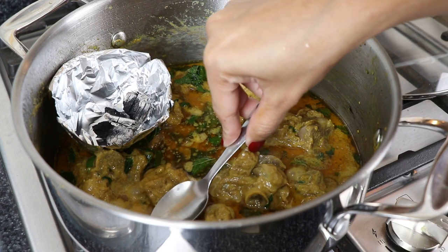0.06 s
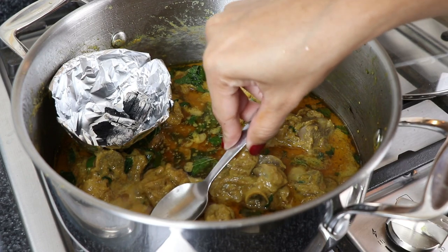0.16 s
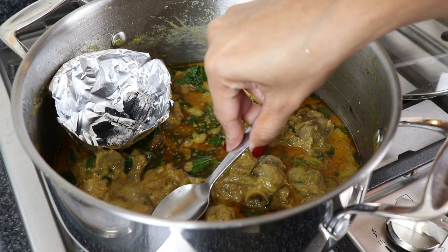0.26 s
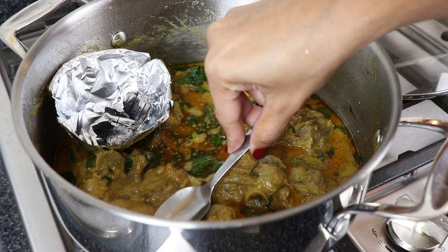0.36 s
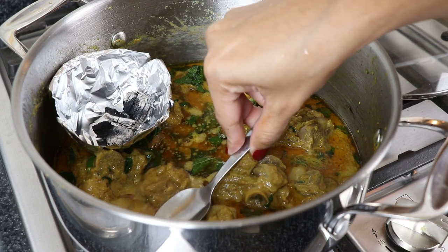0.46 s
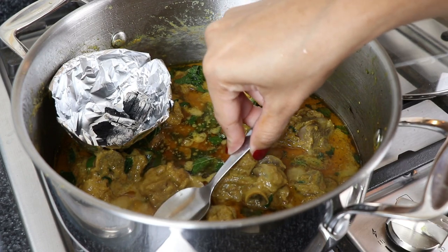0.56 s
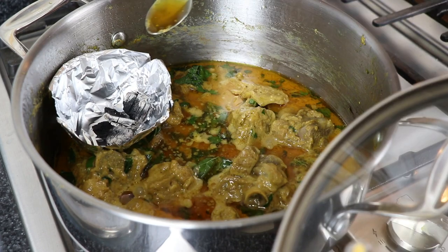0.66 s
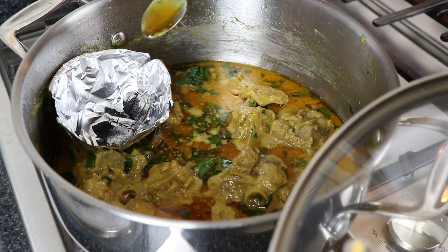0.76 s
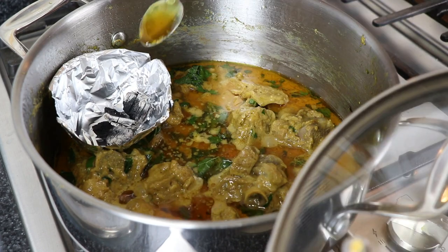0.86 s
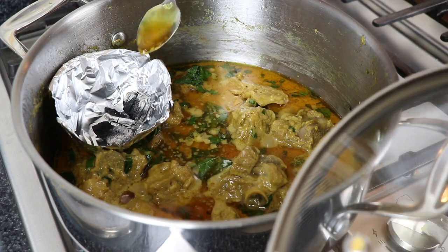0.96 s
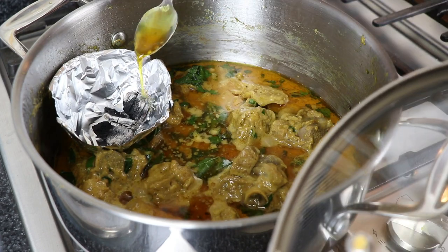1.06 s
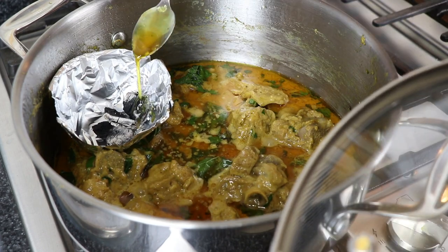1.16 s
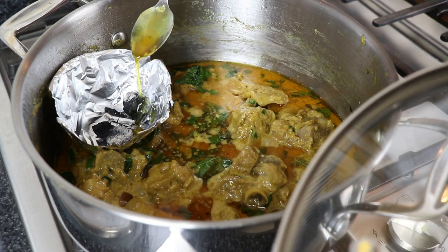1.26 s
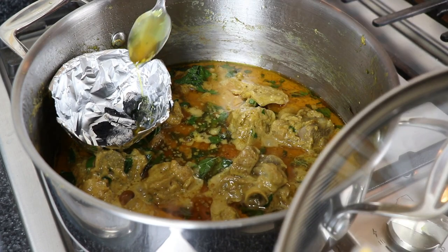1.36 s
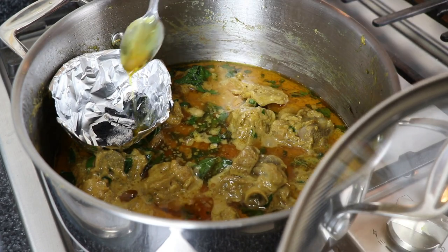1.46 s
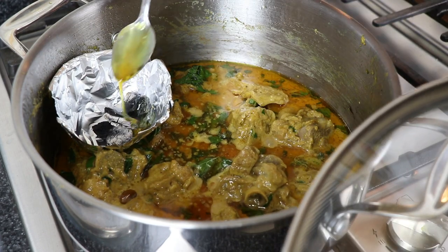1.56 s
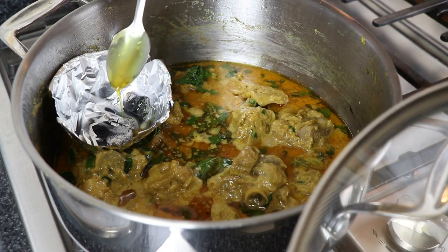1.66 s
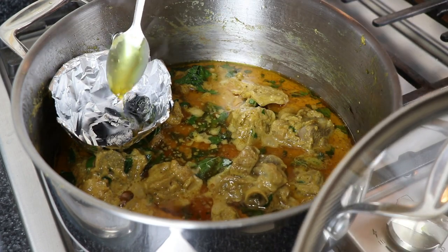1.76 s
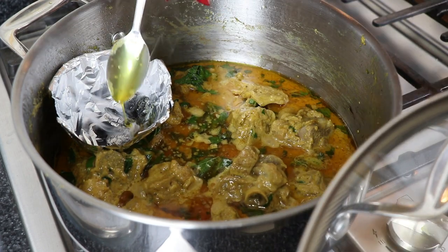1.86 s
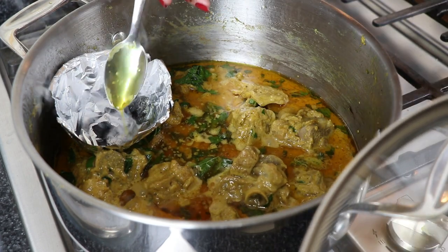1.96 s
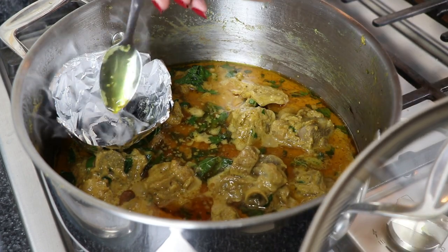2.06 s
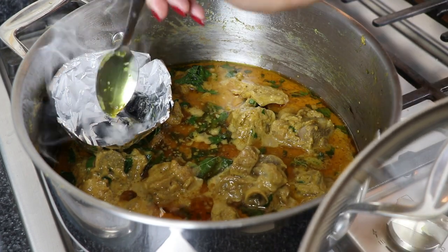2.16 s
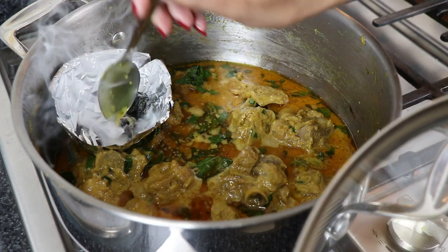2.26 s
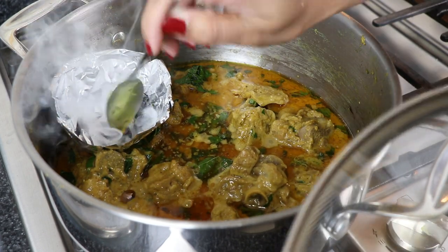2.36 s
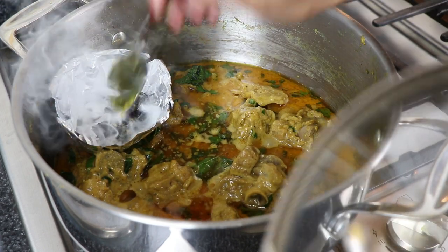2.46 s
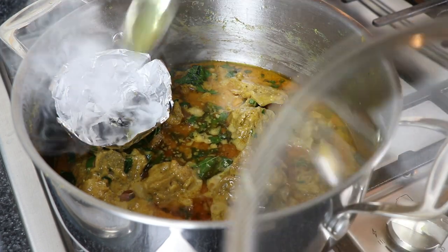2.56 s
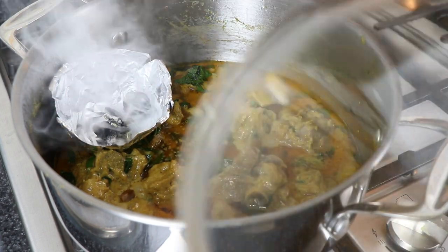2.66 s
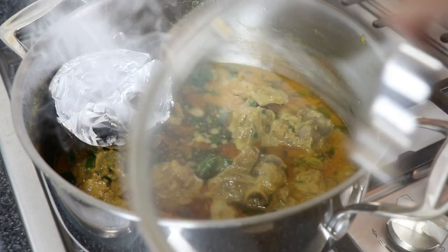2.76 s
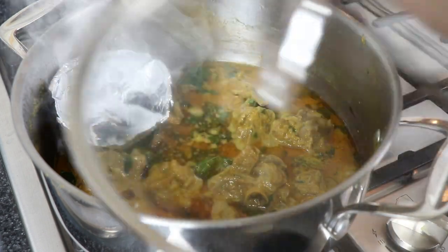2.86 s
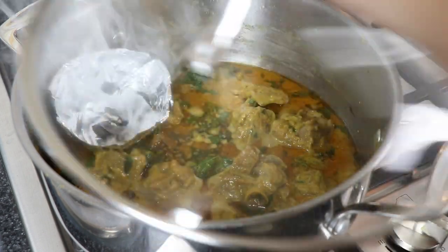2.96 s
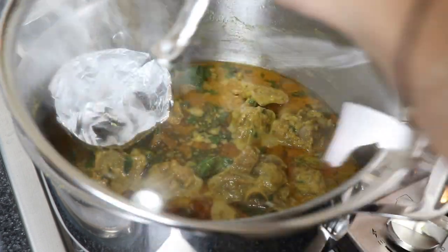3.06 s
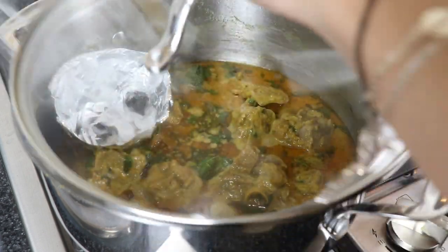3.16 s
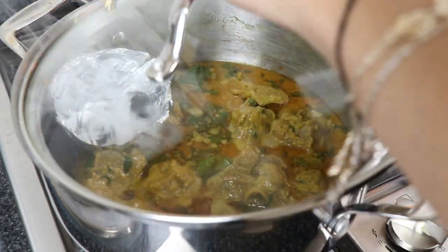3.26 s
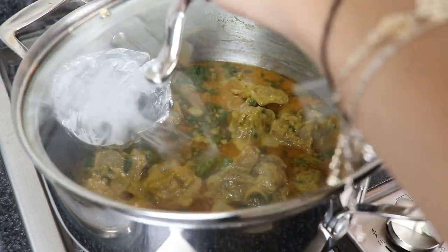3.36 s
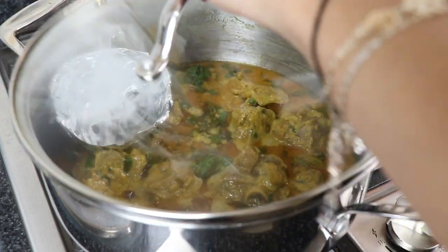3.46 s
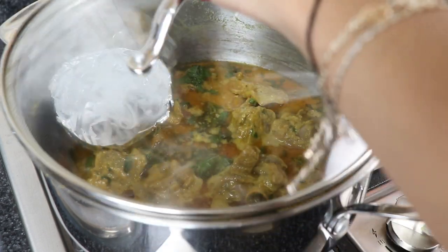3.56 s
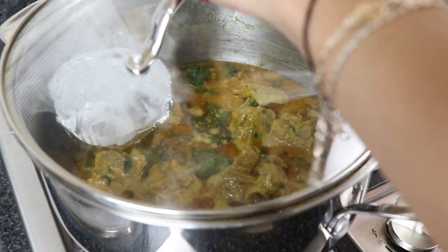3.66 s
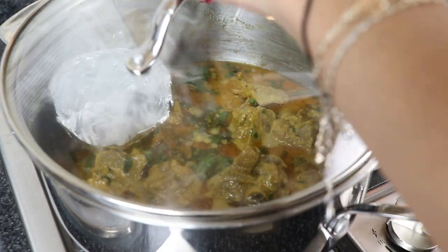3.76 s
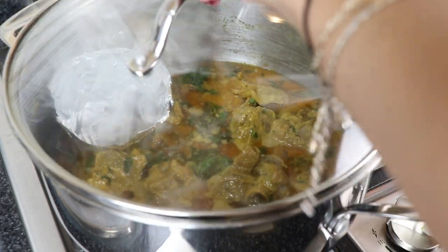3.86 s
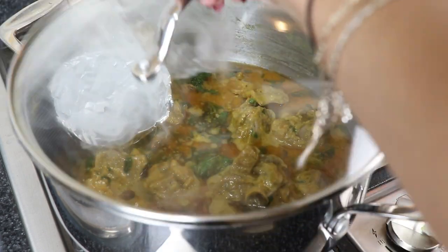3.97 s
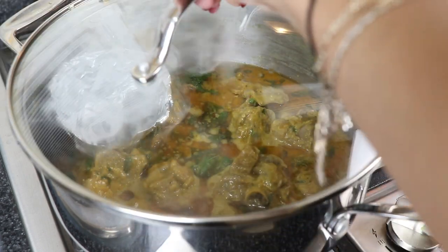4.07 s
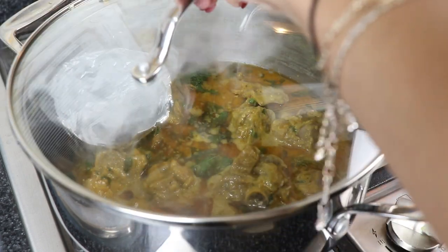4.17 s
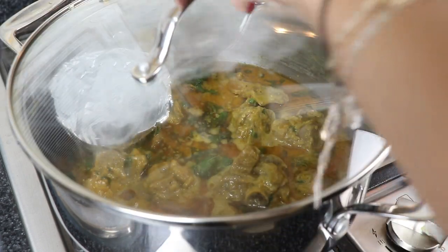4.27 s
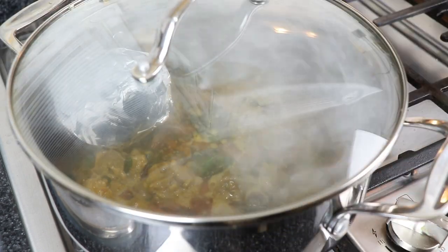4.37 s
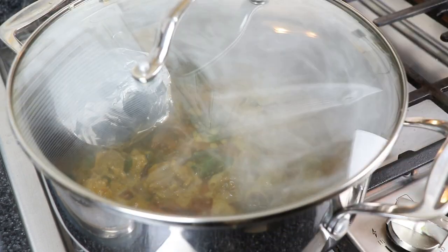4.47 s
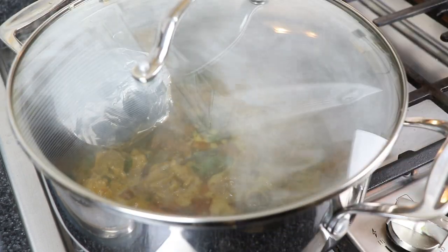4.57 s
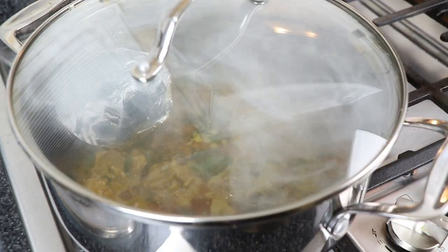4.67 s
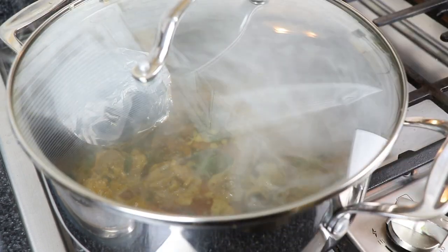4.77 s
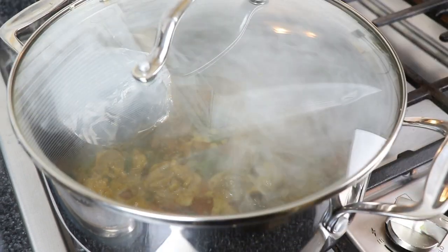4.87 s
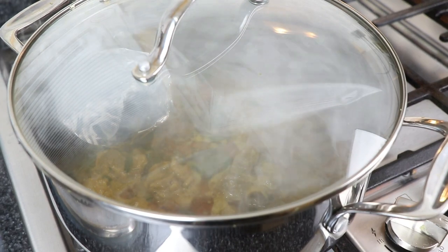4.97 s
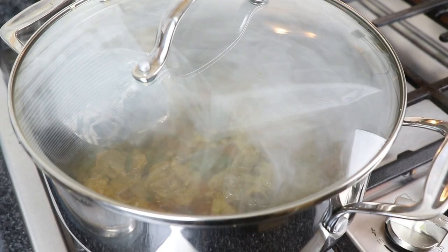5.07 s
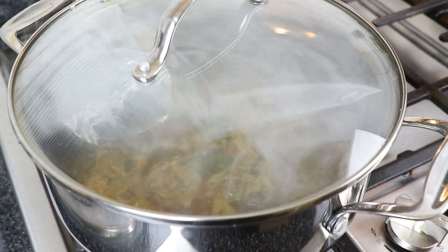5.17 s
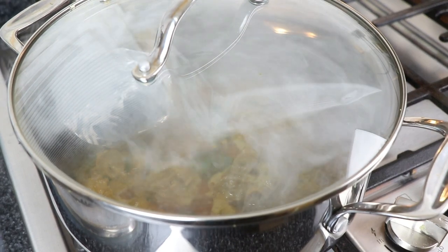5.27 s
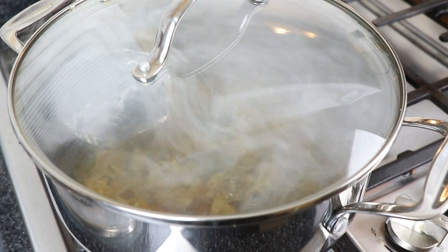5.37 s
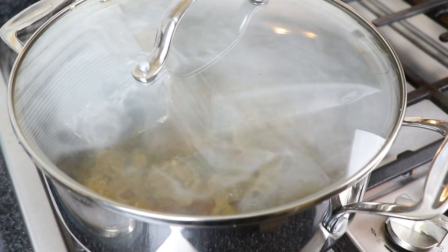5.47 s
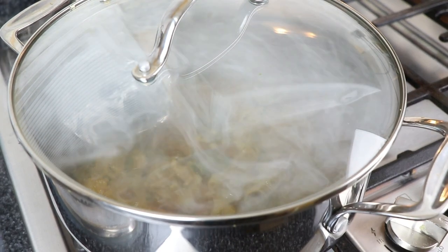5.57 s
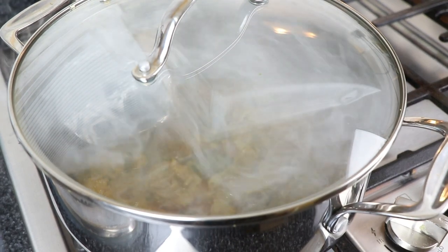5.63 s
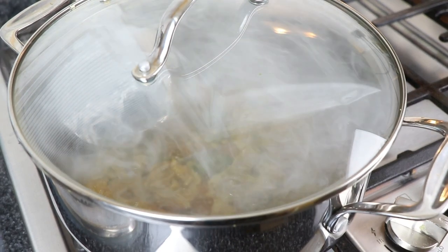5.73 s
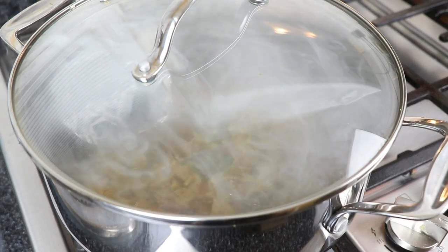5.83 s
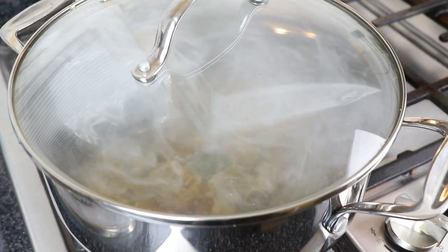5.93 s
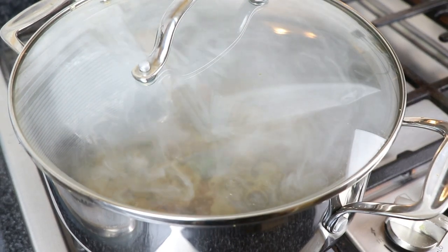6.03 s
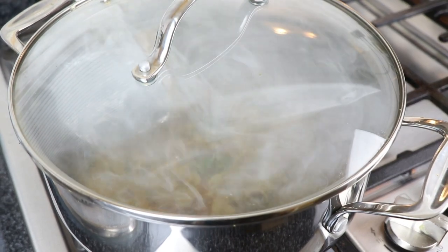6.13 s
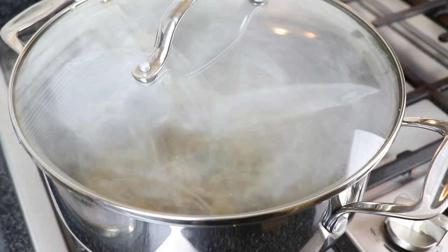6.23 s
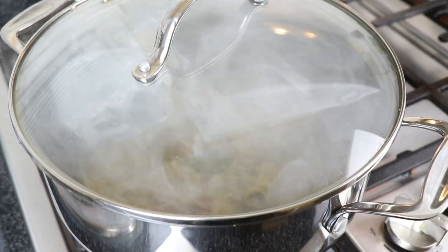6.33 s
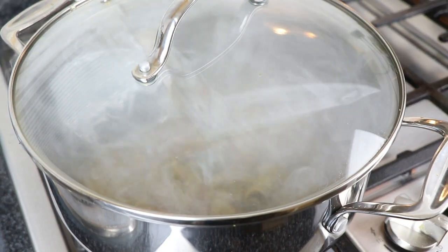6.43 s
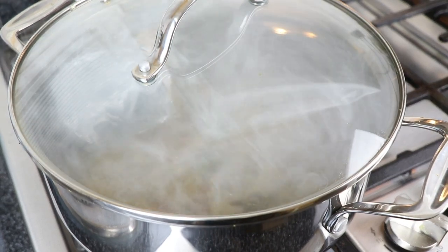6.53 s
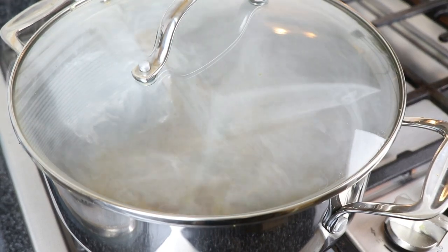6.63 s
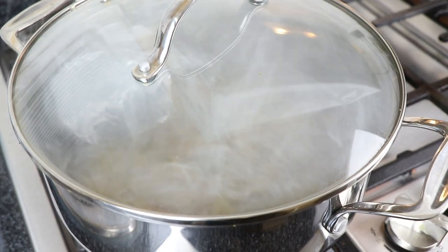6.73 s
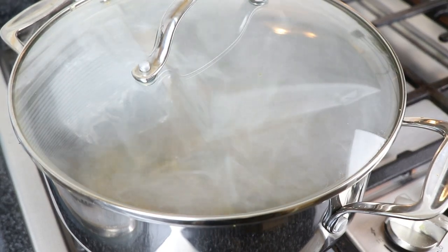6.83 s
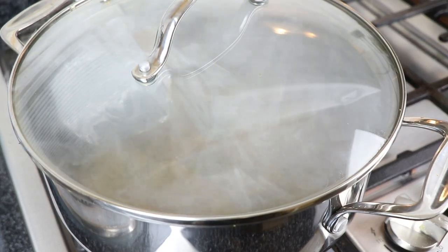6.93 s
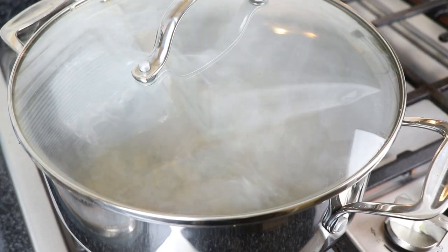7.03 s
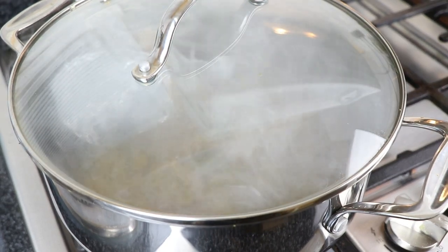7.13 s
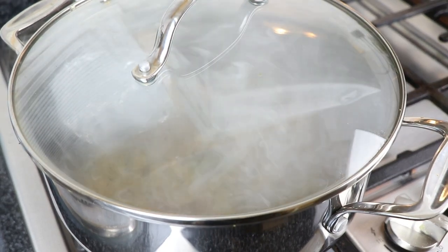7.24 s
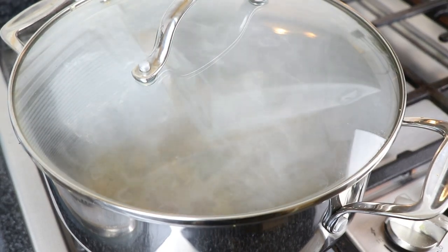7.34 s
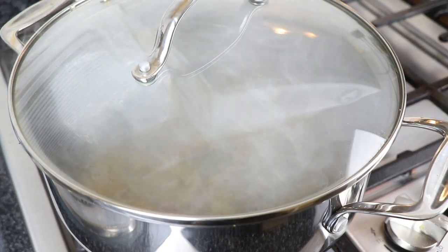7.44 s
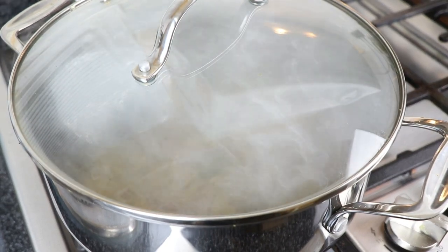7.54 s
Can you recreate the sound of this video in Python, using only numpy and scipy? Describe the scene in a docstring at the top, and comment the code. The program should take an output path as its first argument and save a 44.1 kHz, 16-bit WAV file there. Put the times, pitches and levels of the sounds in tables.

```python
"""A quiet kitchen: melted fat is spooned onto glowing charcoal in a foil cup inside a steel pot of curry.
The fat sizzles as a dense crowd of random pops over vapour hiss, and spits as short band-limited bursts.
A glass lid knocks on the rim, is nudged about and slides into its seat: each contact excites modes of lid and pot.
Under the lid the sizzle dies to single spits. Steady noise and one low buffet of air lie behind.
A close stereo microphone with a limiter hears it all."""
import sys
import numpy as np
from scipy import signal
from scipy.fft import rfft, irfft, next_fast_len
from scipy.io import wavfile

SR = 44100
rng = np.random.default_rng(int(sys.argv[2]) if len(sys.argv) > 2 else 0)


def bounce(signal):
    """Save signal as a 16-bit WAV file at the path given by the first command-line argument."""
    frames = np.transpose(np.atleast_2d(signal))
    limited = np.clip(frames, -1, 1)
    pcm = np.round(limited * 32767).astype(np.int16)
    wavfile.write(sys.argv[1], SR, pcm)


N = 335154
TIME = np.arange(N) / SR

# Spectrum of the kitchen background. Each row: frequency in Hz, relative density in dB per Hz.
KITCHEN_SPECTRUM = [(20, -9), (60, 0), (130, -1), (240, 0.5), (400, -0.5), (850, -2.5), (1500, -4),
                    (2500, -6.5), (5000, -10), (10000, -19.5), (16000, -27.5)]
# Coherence of sound arriving from all round. Each row: frequency in Hz, left-right likeness from -1 to 1.
DIFFUSE_LIKENESS = [(60, 0.79), (130, 0.31), (290, 0.46), (640, 0.44), (1410, 0.14), (3100, 0.041),
                    (6820, 0.13), (15000, 0.38)]
# Coherence of the close lid, alike on both sides in the bass. Each row: frequency in Hz, likeness from -1 to 1.
LID_LIKENESS = [(100, 0.96), (330, 0.98), (640, 0.8), (1400, 0.25), (3000, 0.083), (7000, 0.4),
                (15000, -0.45)]
# Clear modes of lid and pot. Each row: frequency in Hz, relative level in dB, free ring time t60 in seconds.
CLEAR_MODES = [(264, -5, .55), (320, -9, .45), (397, -7, .42), (463, -6, .35), (555, -6, .35),
               (662, -9, .45), (1061, -1.5, .42), (1234, -5, .35), (1437, -5, .4), (1529, -8, .5),
               (1642, -1, .42), (1737, -8, .42), (1822, -7, .42), (2341, -5, .5), (2444, -13, .5),
               (2660, -6, .5), (2948, -8, .5), (3101, -7, .45), (3252, -9, .4), (3725, -3, .42),
               (3898, -5, .4), (4225, -8, .4), (4432, -9, .4), (4920, -9, .4), (5491, -11, .35),
               (6031, -3, .35), (6205, -9, .35), (7009, -9, .3), (7212, -9, .3)]
# Crowd of close modes of lid and pot. Each row: frequency in Hz, relative density in dB per Hz.
CLATTER_SPECTRUM = [(60, 5), (150, -8), (260, -1.5), (500, -2.5), (780, -3), (1100, -4), (1650, -4),
                    (2100, -7.5), (3500, -5), (5000, -7), (7000, -8), (9000, -15), (16000, -16.5)]
# Decay of that crowd. Each row: frequency in Hz, t60 in seconds.
CLATTER_T60 = [(100, 0.83), (400, 0.51), (1500, 0.4), (5000, 0.32), (15000, 0.4)]
# Modes of the heavy pot on its grate. Each row: frequency in Hz, relative level in dB, free t60 in seconds.
THUMP_MODES = [(70, -8, .12), (96, -2, .14), (135, 0, .24), (150, -6, .18), (189, -1, .22), (228, -2, .22)]
# Snap of a contact, a little weaker for the hardest. Each row: softness cut-off in Hz, relative level in dB.
SNAP_LEVEL = [(5000, 11), (10000, 9.5)]
# Light touches of spoon, hand and lid on the pot. Each row: start in seconds, relative level in dB,
# favoured frequency in Hz.
TOUCHES = [(0.838, -29, 1240), (0.925, -26.5, 2000), (2.69, -22, 262), (2.955, -28.5, 210),
           (4.548, -27.5, 630), (4.695, -31, 330), (4.74, -32, 131), (4.835, -32.5, 297),
           (4.935, -38.5, 794), (5.166, -35, 2160), (5.23, -37, 865), (5.552, -36, 1370),
           (7.551, -35, 2380)]
# Slides of the lid along the rim. Each row: start in seconds, relative level in dB, length in seconds,
# contact softness cut-off in Hz, favoured frequency in Hz.
SLIDES = [(3.242, -2, 0.035, 900, 970), (3.311, -11, 0.031, 350, 170), (3.621, -3, 0.011, 1510, 198),
          (3.653, -1, 0.012, 4200, 1680), (3.742, -9.5, 0.045, 500, 227), (3.87, -16, 0.085, 500, 182),
          (3.939, -14, 0.027, 5000, 1700), (3.988, -12, 0.078, 910, 227), (4.042, -8.5, .035, 6000, 3540),
          (4.125, -12.5, 0.082, 2600, 700), (4.425, -13, 0.011, 13000, 10500),
          (4.441, -13.5, 0.049, 7000, 295), (4.483, -14, 0.019, 15900, 9700)]
# Knocks of the lid on the rim. Each row: start in seconds, relative level in dB, chatter in seconds,
# contact softness cut-off in Hz, favoured frequency in Hz.
KNOCKS = [(3.204, 7.5, .0005, 10900, 490), (3.206, 1, 0.00049, 8000, 2780),
          (3.434, -1.5, 0.0077, 5500, 370), (3.457, 0, 0.013, 2940, 1060), (3.604, -9, 0.0025, 4500, 300),
          (3.635, 0, 0.0073, 4180, 1070), (3.72, 0.5, .0004, 4800, 1730), (4.103, 4.5, 0.0014, 4600, 1146),
          (4.105, -2, 0.00087, 130, 88.6), (4.115, -1, .001, 2960, 570)]
# Single spits of fat. Each row: start in seconds, relative level in dB, centre in Hz, length in seconds.
SPITS = [(0.671, -38, 7500, .003), (0.767, -30.5, 8600, .008), (1.007, -28.5, 6400, 0.0029),
         (1.074, -29.5, 1770, 0.0026), (1.185, -27, 4200, 0.0031), (1.361, -15.5, 5960, 0.00047),
         (1.512, -17, 3800, 0.0026), (1.549, -5, 7200, 0.014), (1.63, -19, 3170, 0.0027),
         (1.971, -22.5, 5000, 0.0012), (2.028, -11, 6100, 0.02), (2.149, -19, 4300, 0.0018),
         (2.289, -12, 5500, 0.02), (2.349, -15.5, 4960, .001), (2.415, -15, 7500, .03),
         (2.721, -8, 4530, 0.0065), (2.722, -9, 1990, 0.013), (2.854, -14, 4150, 0.011),
         (3.025, -17, 3950, 0.00037), (3.117, -21, 7900, 0.027), (4.312, -33.5, 8900, 0.0052),
         (5.873, -46.5, 2480, .002), (5.986, -36, 2800, 0.00027), (6.246, -32, 6670, 0.022),
         (6.464, -37, 3830, 0.02), (6.493, -31.5, 8560, 0.012), (6.56, -37, 2780, 0.034),
         (6.579, -35.5, 8000, 0.013), (6.671, -37, 5950, 0.043), (6.856, -40, 9600, .035),
         (6.905, -39, 9400, 0.043), (7.047, -33, 9000, 0.017), (7.102, -31.5, 7500, 0.018),
         (7.221, -36, 7140, 0.044), (7.534, -39.5, 8500, 0.058)]
# Strength of frying: first drops, the pour, a second flush, then dying under the lid.
# Each row: time in seconds, relative level in dB.
SIZZLE_LEVEL = [(0.65, -49.5), (1.16, -47.5), (1.2, -36), (1.38, -28), (1.63, -24.5), (1.74, -29),
                (2.23, -27.5), (2.34, -22), (2.62, -24.5), (2.88, -28.5), (2.98, -33.5), (3.28, -30),
                (3.62, -37), (4.3, -50.5), (4.65, -62.5), (5.9, -67), (6.05, -59.5), (7.6, -66.5)]
# Colour of the sizzle. Each row: frequency in Hz, relative density in dB per Hz.
FRYING_SPECTRUM = [(60, -21), (250, -23), (500, -8), (760, -10), (1300, -9), (2000, -4.5), (3300, -2.5),
                   (5000, 0), (7000, 1.5), (9200, -1.5), (12000, -4.5), (16000, -14)]
# Air resonances of the open pot. Each row: frequency in Hz, width in Hz, lift in dB.
POT_RESONANCES = [(265, 16, 7), (318, 20, 6), (506, 60, 7), (1045, 80, 9), (1160, 50, 5), (1550, 160, 5),
                  (2050, 90, 2), (2340, 70, 2), (2640, 150, 3), (4260, 70, 2.5), (5140, 60, 3),
                  (6000, 130, 4), (6410, 80, 4), (9100, 500, 3)]
# Spectrum of the air buffet. Each row: frequency in Hz, relative density in dB per Hz.
DRAUGHT_SPECTRUM = [(20, -16), (45, -9.5), (80, 0.5), (140, -17.0), (300, -11.5), (600, -27.0),
                    (1200, -41), (4000, -83.5)]

# The kitchen is louder around the open pot and settles once the lid is shut.
OPEN_DB, SHUT_DB, SETTLE_S = -44.5, -52.5, 1.0
# A draught buffets the microphone, swelling fast and fading slowly.
DRAUGHT_S, DRAUGHT_DB, DRAUGHT_RISE_DB_PER_S, DRAUGHT_FALL_DB_PER_S = 1.785, -29, 280, 116
# The lid hangs from the hand, then lies on the rim, then slides shut (s).
HANGS_S, RESTS_S, SHUT_S = 3.1, 4.0, 4.42
# Share of the free ring time, and clear-mode level in dB: hanging freely, and otherwise.
FREE, DAMPED = (0.89, -6), (0.67, -10.5)
# A soft contact rocks the whole pot; above the knee a harder one thumps less.
THUMP_KNEE_HZ, THUMP_LOSS_DB_PER_OCTAVE = 2200, 6
# A contact longer than a sudden one swells over a share of its extra length.
SUDDEN_S, SWELL_SHARE = 0.014, 0.77
KNOCK_LIFT_DB, KNOCK_THUMP_DB = 11, -5
SLIDE_LIFT_DB, SLIDE_THUMP_DB = 6, -14.0
# A touch has its cut-off at TOUCH_REACH times its favoured frequency.
TOUCH_S, TOUCH_REACH, TOUCH_LIFT_DB, TOUCH_THUMP_DB = 0.027, 2, 10, -19.5
# Nominal bandwidth of a spit in octaves; one as short as a snap covers twice as much.
SPIT_OCTAVES, SNAP_S = 0.55, 0.00085
# The finest spray builds up as the fat spreads over the ember.
POUR_S, SPRAY_BUILD_S, DRY_SPRAY_DB, WET_SPRAY_DB = 0.96, 0.51, -7, 6
# The output is silent before START_S and loses what lies above CUTOFF_HZ.
START_S, CUTOFF_HZ = 0.654, 16100


def from_db(db):
    """Amplitude ratio: twenty decibels make a factor of ten."""
    return 10 ** (np.asarray(db) / 20)


def rms_one(x):
    """Normalization of mean power to one."""
    return x / np.sqrt(np.mean(x ** 2) + 1e-20)


def energy_one(x):
    """Normalization of the mean energy per channel to one."""
    return rms_one(x) / np.sqrt(x.shape[-1])


def in_time(rows):
    """Linear interpolation of each column of a time curve."""
    s, *columns = np.transpose(rows)
    return [np.interp(TIME, s, column) for column in columns]


def at_hz(points, hz):
    """Interpolation on a logarithmic frequency axis."""
    f, value = np.transpose(points)
    return np.interp(np.log(hz + 1e-9), np.log(f), value)


def ramp(start_s, length_s):
    """Linear transition from 0 to 1, held thereafter."""
    return np.clip((TIME - start_s) / length_s, 0, 1)


def drift(per_s):
    """Slow random fluctuation: interpolated Gaussian knots with unit rms."""
    knots = rng.standard_normal(4096)
    return rms_one(np.interp(TIME * per_s, np.arange(len(knots)), knots))


def dying(t, t60):
    """Exponential decay: the amplitude falls by 60 dB in t60."""
    return np.exp(-np.log(1000) * t / t60)


def filtered(x, hz, kind, order=2):
    """Causal Butterworth filtering, maximally flat in the passband."""
    edges = np.clip(hz, 10, 0.48 * SR)
    sections = signal.butter(order, edges, kind, fs=SR, output="sos")
    return signal.sosfilt(sections, x)


def lifted(x, hz, width_hz, lift_db):
    """Resonance: a band around one frequency is reinforced."""
    b, a = signal.iirpeak(hz, hz / width_hz, fs=SR)
    return x + (from_db(lift_db) - 1) * signal.lfilter(b, a, x)


def coloured(x, spectrum):
    """Spectral shaping: each frequency is weighted by a smooth curve."""
    length = x.shape[-1]
    size = next_fast_len(length)
    gain = from_db(at_hz(spectrum, np.fft.rfftfreq(size, 1 / SR)))
    return irfft(rfft(x, size) * gain, size)[..., :length]


def diffuse(size, likeness=DIFFUSE_LIKENESS):
    """Partial coherence: independent mid and side noises set the likeness at each frequency."""
    padded = next_fast_len(size)
    mid, side = rfft(rng.standard_normal((2, padded)))
    alike = np.clip(at_hz(likeness, np.fft.rfftfreq(padded, 1 / SR)), -1, 1)
    spectrum = np.sqrt(1 + alike) * mid + np.sqrt(1 - alike) * side * [[1], [-1]]
    return rms_one(irfft(spectrum, padded)[:, :size])


def add(out, s, sound):
    """Superposition of a sound at its start time."""
    at = round(s * SR)
    out[:, at:at + sound.shape[1]] += sound[:, :N - at]


def slips(length_s, per_s, first_db):
    """Random impulsive excitation: a first click, then uneven random clicks; unit energy."""
    t = TIME[:SR // 8]
    occurs = rng.random(len(t)) < per_s / SR
    run = rng.standard_normal(len(t)) * occurs * np.exp(-(t / length_s) ** 4)
    run[0] = from_db(first_db)
    return energy_one(run)


def pot_echo(walls_db, walls_t60, room_db, room_t60):
    """Impulse response: a direct click, left side first, with reverberation of steel walls and kitchen."""
    t = TIME[:SR // 3]
    direct = np.zeros((2, len(t)))
    direct[0, 0] = direct[1, 2] = 1
    walls = from_db(walls_db) * energy_one(diffuse(len(t)) * dying(t, walls_t60))
    room = from_db(room_db) * energy_one(diffuse(len(t)) * dying(t, room_t60))
    return energy_one(direct + walls + room)


def kitchen():
    """Stationary diffuse noise whose level falls as the pot is closed."""
    level_db = OPEN_DB + (SHUT_DB - OPEN_DB) * ramp(SHUT_S, SETTLE_S)
    return from_db(level_db) * rms_one(coloured(diffuse(N), KITCHEN_SPECTRUM))


def draught():
    """Turbulent pressure on a microphone: low noise with an exponential rise and fall."""
    eddies = rms_one(coloured(diffuse(N), DRAUGHT_SPECTRUM))
    since = TIME - DRAUGHT_S
    gust_db = DRAUGHT_DB + np.minimum(DRAUGHT_RISE_DB_PER_S * since, -DRAUGHT_FALL_DB_PER_S * since)
    return from_db(gust_db) * eddies


def ringing(modes, t, vary_db, ring_share=1):
    """Modal superposition: decaying sinusoids, newly weighted at every blow; unit energy."""
    hz, db, t60 = np.transpose(modes)
    # the changing pressure on the rim detunes each mode a little
    hz = hz * (1 + 0.005 * rng.standard_normal(len(hz)))
    strength = from_db(db + vary_db * rng.standard_normal(len(hz)))
    # the less alike the sides are at a frequency, the further they fall out of phase
    skew = np.arccos(np.clip(at_hz(LID_LIKENESS, hz), -1, 1))
    skew = skew * rng.standard_normal((2, len(hz))) / np.sqrt(2)
    turn = np.float32(2 * np.pi * hz[:, None] * t)
    decay = np.float32(dying(t, ring_share * t60[:, None]))
    in_phase = (strength * np.cos(skew)) @ (np.sin(turn) * decay)
    quadrature = (strength * np.sin(skew)) @ (np.cos(turn) * decay)
    return energy_one(in_phase + quadrature)


def clatter(t, snap_db, crack_db, crack_t60):
    """High modal density: crowded modes act as noise with a snap, a crack and a tail for each band."""
    noise = coloured(diffuse(len(t), LID_LIKENESS), CLATTER_SPECTRUM)
    snap = from_db(snap_db) * dying(t, 0.007)
    crack = from_db(crack_db) * dying(t, crack_t60)
    out = noise * (snap + crack)
    for hz in np.geomspace(250, 16000, 7):
        band = filtered(noise, [hz / np.sqrt(2), hz * np.sqrt(2)], "band", order=1)
        out = out + band * dying(t, at_hz(CLATTER_T60, hz))
    return energy_one(out)


def contact(s, length_s, soft_hz, hz, lift_db, thump_db, favoured_width=0.4):
    """Source-filter principle: contact clicks excite lid and pot, favouring one register; unit energy."""
    t = TIME[:SR * 2 // 3]
    ring_share, clear_db = FREE if HANGS_S < s < RESTS_S else DAMPED
    ring = ringing(CLEAR_MODES, t, vary_db=4.5, ring_share=ring_share)
    crowd = clatter(t, snap_db=at_hz(SNAP_LEVEL, soft_hz), crack_db=5.0, crack_t60=0.05)
    hard_octaves = max(np.log2(soft_hz / THUMP_KNEE_HZ), 0)
    thump_gain = from_db(thump_db - THUMP_LOSS_DB_PER_OCTAVE * hard_octaves)
    thump = thump_gain * ringing(THUMP_MODES, t, vary_db=1.5)
    body = crowd + from_db(clear_db) * ring + thump
    body = filtered(body, soft_hz, "low", order=1)
    body = lifted(body, hz, favoured_width * hz, lift_db)
    # a knock is mostly one click, a slide is many small ones
    rub = slips(length_s, per_s=1500, first_db=np.interp(length_s, [0.002, 0.02], [11, 3]))
    # a slide swells as the hand presses on
    swell_s = SWELL_SHARE * max(length_s - SUDDEN_S, 0)
    rub = rub * np.minimum((TIME[:len(rub)] + 1 / SR) / (swell_s + 1 / SR), 1)
    return energy_one(signal.fftconvolve(rub[None], body))


def contacts(level_db):
    """Impact and friction: touches, slides and knocks excite the same lid and pot."""
    out = np.zeros((2, N))
    for s, db, hz in TOUCHES:
        touch = contact(s, TOUCH_S, TOUCH_REACH * hz, hz, TOUCH_LIFT_DB, TOUCH_THUMP_DB)
        add(out, s, from_db(db) * touch)
    for s, db, length_s, soft_hz, hz in SLIDES:
        slide = contact(s, length_s, soft_hz, hz, SLIDE_LIFT_DB, SLIDE_THUMP_DB)
        add(out, s, from_db(db) * slide)
    for s, db, chatter_s, soft_hz, hz in KNOCKS:
        knock = contact(s, chatter_s, soft_hz, hz, KNOCK_LIFT_DB, KNOCK_THUMP_DB)
        add(out, s, from_db(db) * knock)
    # the pot is too small to radiate deep bass
    return from_db(level_db) * filtered(out, 109, "high", order=3)


def spits(level_db):
    """Time-bandwidth reciprocity: bursting droplets fizz in their own bands, the shorter the broader."""
    out = np.zeros((2, N))
    for s, db, hz, length_s in SPITS:
        octaves = SPIT_OCTAVES * (1 + SNAP_S / length_s)
        echo = pot_echo(walls_db=-2.0, walls_t60=0.03, room_db=-5.0, room_t60=0.3)
        first_db = np.interp(length_s, [0.01, 0.03], [17, 10])
        fizz = slips(length_s, per_s=6000, first_db=first_db)
        burst = signal.fftconvolve(fizz[None], echo)
        edges = hz * 2 ** (octaves * np.array([-0.5, 0.5]))
        burst = filtered(burst, edges, "band", order=1)
        # the top octave falls away steeply
        burst = lifted(burst, 10500, 3000, 3.0)
        burst = filtered(burst, 12000, "low", order=5)
        add(out, s, from_db(db + level_db) * energy_one(burst))
    return out


def sizzle(pops_per_s, spread_db, hiss_db, surge_db, level_db, count=8):
    """Shot noise: random bursts of boiling fat crowd together over vapour hiss as the frying grows."""
    loud_db, = in_time(SIZZLE_LEVEL)
    spray_db = DRY_SPRAY_DB + (WET_SPRAY_DB - DRY_SPRAY_DB) * ramp(POUR_S, SPRAY_BUILD_S)
    # pops_per_s is reached where the frying is loudest
    crowding = from_db(loud_db - loud_db.max())
    sizes = from_db(spread_db * np.minimum(rng.exponential(1, N), 4)) * rng.choice([-1, 1], N)
    occurs = rng.random(N) < pops_per_s * crowding / SR
    pops = sizes * occurs / np.sqrt(crowding)
    # each spot on the ember has its own reflections and its own bubble size, hence pitch
    spot = rng.integers(0, count, N)
    crackle = np.zeros((2, N))
    for k, hz in enumerate(np.geomspace(2200, 11000, count)):
        echo = pot_echo(walls_db=-4.5, walls_t60=0.02, room_db=-1.5, room_t60=0.19)
        echo = lifted(echo, hz, hz / 2, lift_db=11.0)
        spot_pops = (pops * (spot == k))[None]
        crackle += signal.oaconvolve(spot_pops, echo, axes=1)[:, :N]
    frying = coloured(rms_one(crackle) + from_db(hiss_db) * diffuse(N), FRYING_SPECTRUM)
    for hz, width_hz, lift_db in POT_RESONANCES:
        frying = lifted(frying, hz, width_hz, lift_db)
    frying = rms_one(frying)
    # the spray is the treble of the frying, first weakened, then strengthened
    spray = coloured(frying, [(6500, -31), (9000, -16.0), (12500, -6)])
    frying = frying + (from_db(spray_db) - 1) * spray
    return frying * from_db(loud_db + level_db + surge_db * drift(120))


def scene():
    """Linear superposition of kitchen, lid and ember."""
    background = kitchen() + draught()
    lid_and_pot = contacts(level_db=19.5)
    droplets = spits(level_db=19.5)
    frying = sizzle(pops_per_s=9000, spread_db=6.0, hiss_db=-7.5, surge_db=0.7, level_db=2.0)
    return background + lid_and_pot + droplets + frying


def limited(x, threshold_db, release_db_per_s, attack_s):
    """Gain control: the level ducks a few milliseconds after a loud peak and creeps back."""
    peak_db = 20 * np.log10(np.abs(x).max(axis=0) + 1e-9)
    over = np.maximum(peak_db - threshold_db, 0)
    release = release_db_per_s * TIME
    held = np.maximum.accumulate(over + release) - release
    window = np.hanning(round(attack_s * SR))
    reduction_db = signal.oaconvolve(held, window / window.sum())[:N]
    return x * from_db(-reduction_db)


def record(dry):
    """Nonlinear transmission: an initial silence, a limiter, saturation of peaks and a steep top cut."""
    sounding = dry * (TIME >= START_S)
    x = limited(sounding, threshold_db=-2.0, release_db_per_s=67.0, attack_s=0.016)
    top_cut = signal.ellip(10, 0.05, 60, CUTOFF_HZ, fs=SR, output="sos")
    return signal.sosfiltfilt(top_cut, np.tanh(x))


dry = scene()
out = record(dry)
bounce(out)
```